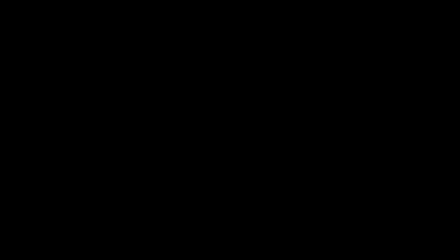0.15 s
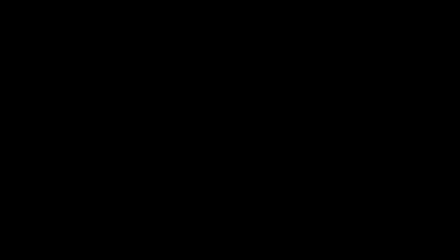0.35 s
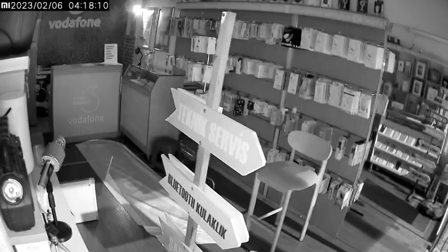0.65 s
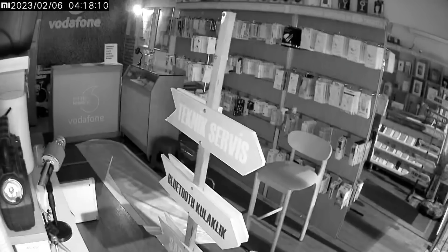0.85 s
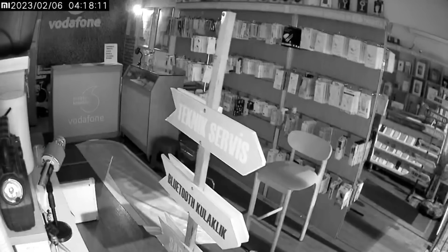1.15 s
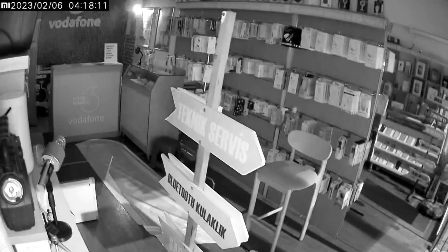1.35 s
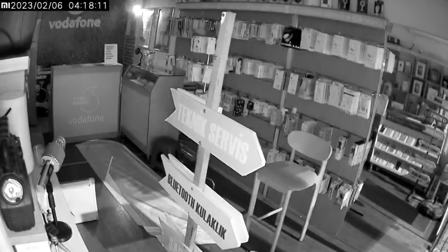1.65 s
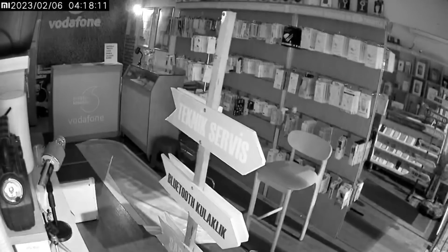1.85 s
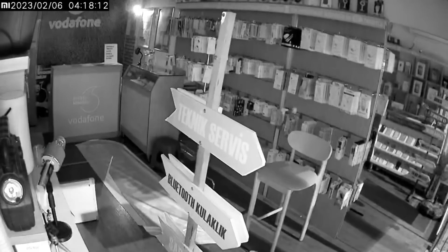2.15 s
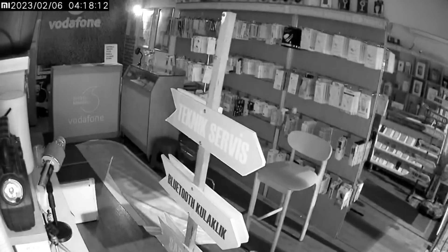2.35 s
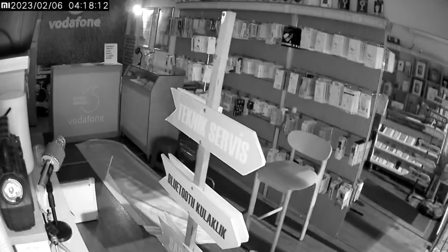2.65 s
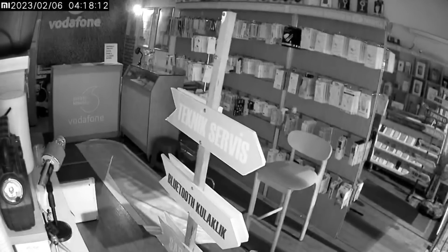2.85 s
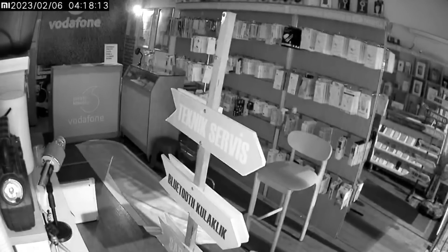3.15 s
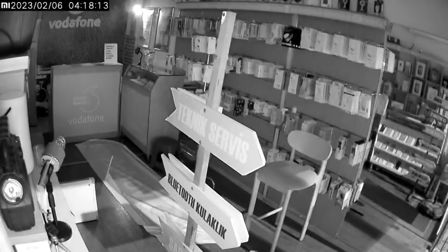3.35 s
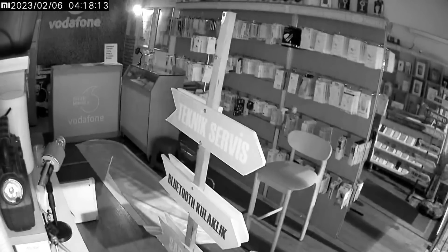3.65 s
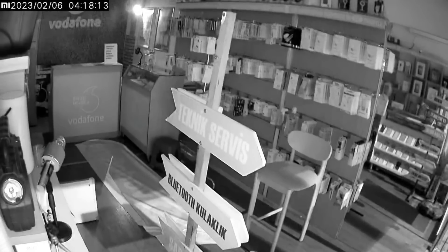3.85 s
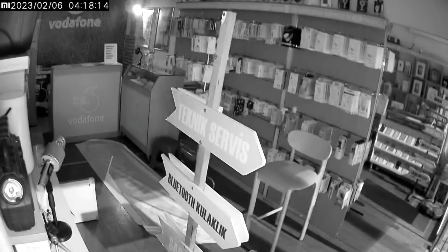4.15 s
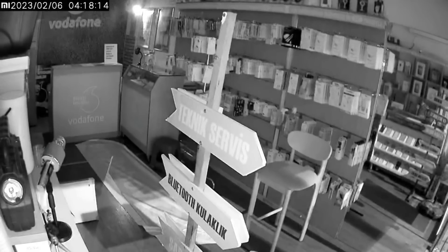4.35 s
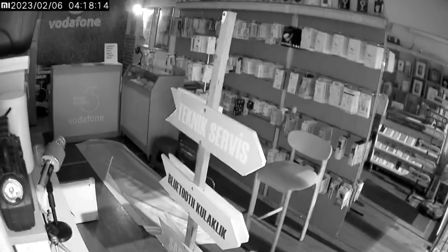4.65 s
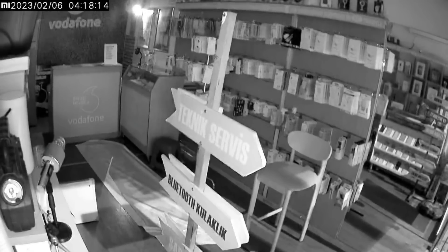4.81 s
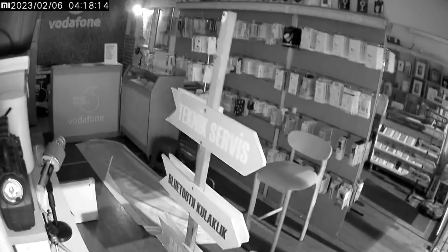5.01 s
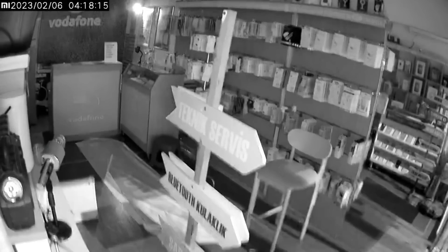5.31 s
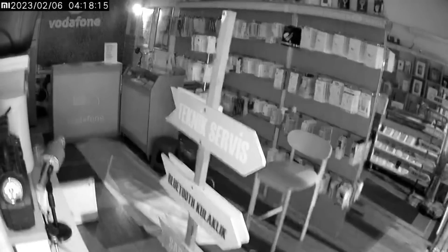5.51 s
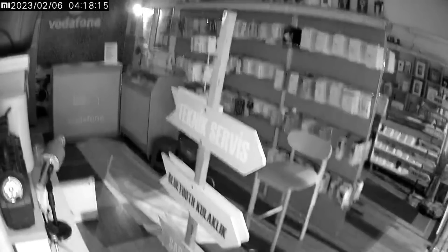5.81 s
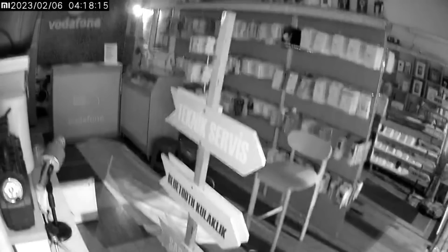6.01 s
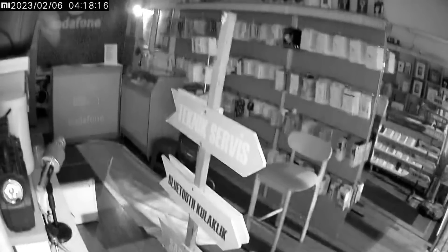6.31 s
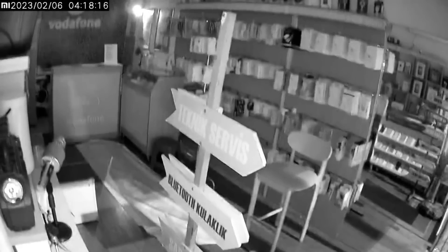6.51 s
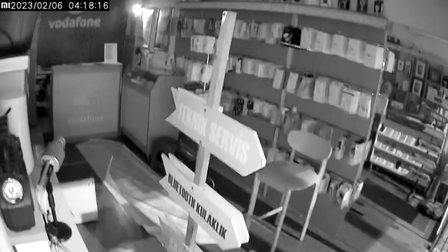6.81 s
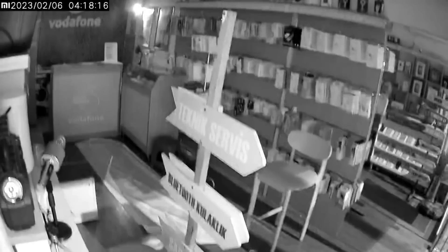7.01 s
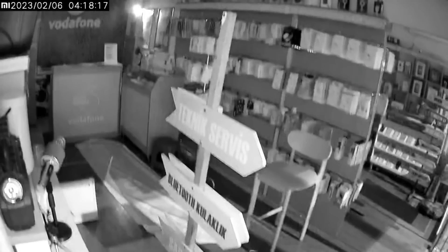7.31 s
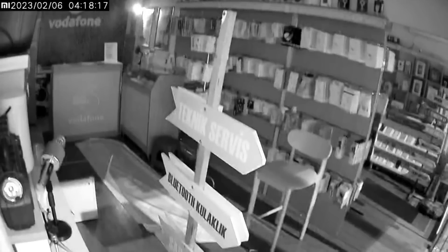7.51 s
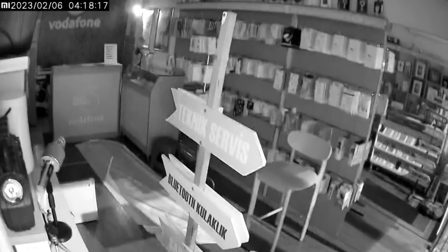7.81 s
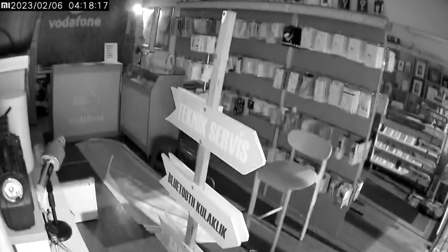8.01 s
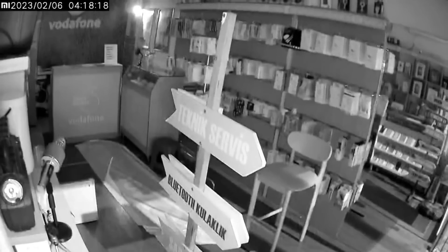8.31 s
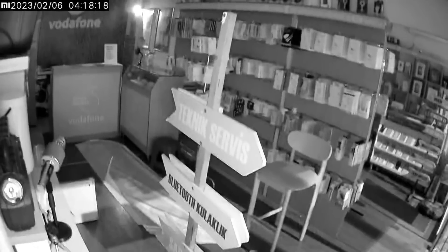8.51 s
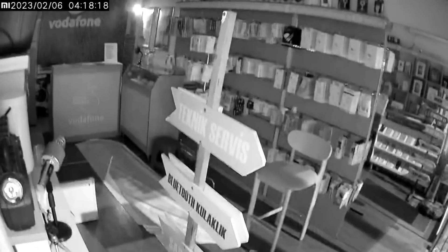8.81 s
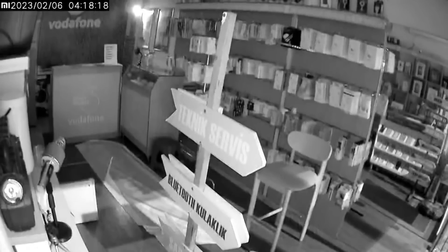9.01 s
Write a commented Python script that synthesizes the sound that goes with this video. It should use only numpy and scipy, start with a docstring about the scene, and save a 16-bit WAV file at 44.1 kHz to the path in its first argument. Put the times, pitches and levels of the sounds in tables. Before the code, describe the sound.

After a brief roar and silence, a building rumbles while a panel knocks, cabinets thud and goods tumble from rattling shop shelves.

```python
"""Earthquake in a small shop

A brief roar breaks off, and after a silence the scene changes. The building rumbles, shelves rattle, cabinets
thud and a loose panel knocks again and again against its stop. Goods tip, slide and crash to the floor; thin,
high tones linger after the blows. The shop is heard through a narrow-band security camera microphone that drops
out briefly four times."""
import sys
import numpy as np
from scipy import signal
from scipy.fft import rfft, irfft, next_fast_len
from scipy.io import wavfile

SR = 44100
rng = np.random.default_rng(int(sys.argv[2]) if len(sys.argv) > 2 else 0)


def output_pcm(signal):
    """Save a mono or channel-first signal as 16-bit PCM at the path in sys.argv[1].

    Samples are clipped to [-1, 1] before scaling.
    """
    pcm = np.clip(np.atleast_2d(signal).T, -1, 1) * 32767
    wavfile.write(sys.argv[1], SR, np.round(pcm).astype(np.int16))


N = 403956
TIME_S = np.arange(N) / SR
BLOW_S = np.arange(SR // 2) / SR   # time within one blow
MIC_TOP_HZ = 5050


def from_db(db):
    """Decibels to gain."""
    return np.exp(np.asarray(db) * (np.log(10) / 20))


def unit_rms(x):
    """Scale to unit power."""
    return x / np.sqrt(np.mean(x ** 2) + 1e-20)


def curves(rows):
    """Interpolate each column after t/s to every sample."""
    times_s, *columns = np.transpose(rows)
    return [np.interp(TIME_S, times_s, column) for column in columns]


def coloured(x, spectrum, tilt_db_oct=0):
    """Filter by a tilted spectrum, with 24 dB/octave skirts; unit power."""
    size = next_fast_len(len(x))
    octave = np.log2(np.maximum(np.fft.rfftfreq(size, 1 / SR), 1))
    hz, db = np.transpose(spectrum)
    outside_oct = np.maximum(octave - np.log2(hz[-1]), 0) + np.maximum(np.log2(hz[0]) - octave, 0)
    gain_db = np.interp(octave, np.log2(hz), db) + tilt_db_oct * octave - 24 * outside_oct
    return unit_rms(irfft(rfft(x, size) * from_db(gain_db), size)[:len(x)])


def tilt_treble(x, tilt_db_oct, corner_hz):
    """Tilt each row of x above a corner."""
    size = x.shape[-1]
    octaves = np.log2(1 + (np.fft.rfftfreq(size, 1 / SR) / corner_hz) ** 4) / 4
    return irfft(rfft(x) * from_db(tilt_db_oct * octaves), size)


def wash(spectrum, tilt_db_oct=0):
    """Coloured noise, one blow long."""
    return coloured(rng.standard_normal(len(BLOW_S)), spectrum, tilt_db_oct)


def tone(hz):
    """Sine, one blow long."""
    return np.sin(2 * np.pi * hz * BLOW_S)


def clang(partials=24, low_hz=1200):
    """Scattered partials of hard objects; unit power."""
    hz = rng.uniform(low_hz, MIC_TOP_HZ, (partials, 1))
    phase = 2 * np.pi * (hz * BLOW_S + rng.random((partials, 1)))
    return unit_rms(rng.standard_normal(partials) @ np.sin(phase.astype(np.float32)))


def contacts(per_s, size, spread_db):
    """Small impacts at random times."""
    out = np.zeros(size)
    at = np.flatnonzero(rng.random(size) < per_s / SR)
    signs = rng.choice([-1, 1], len(at))
    out[at] = signs * from_db(spread_db * np.minimum(rng.exponential(1, len(at)), 4))
    return out


def decay(t60_s, rise_s, hold_s=0):
    """Envelope: linear rise, hold, exponential fall."""
    falling_s = np.maximum(BLOW_S - rise_s - hold_s, 0)
    return np.minimum(BLOW_S / rise_s, 1) * from_db(-60 * falling_s / t60_s)


def burst(x, envelope):
    """Apply an envelope and scale to the envelope's energy."""
    return x * envelope * np.sqrt(np.sum(envelope ** 2) / np.sum((x * envelope) ** 2))


def drift(per_s):
    """Lines between unit Gaussian knots."""
    knots = rng.standard_normal(2000)
    return np.interp(TIME_S * per_s, np.arange(len(knots)), knots)


def add(out, t_s, sound):
    """Mix a sound in at t_s."""
    at = max(int(t_s * SR), 0)
    out[at:at + len(sound)] += sound[:N - at]


# roar envelope: t/s, level/dB
ROAR_LEVELS = [(0.0, -15.5), (0.064, -10.5), (0.14, -11)]
# roar spectrum: f/Hz, level/dB
ROAR_SPECTRUM = [(25, -27), (65, -8), (95, -20), (140, -6.5), (175, -2.5), (230, -3), (320, -3),
                 (410, -10.5), (560, -14), (700, -9), (1100, -14.5), (1750, -16), (2700, -25.5),
                 (5000, -33.5), (11500, -59)]


def roar(end_s=0.1487):
    """Loud, dense noise that breaks off dead; then the scene changes."""
    level_db, = curves(ROAR_LEVELS)
    return from_db(level_db) * coloured(rng.standard_normal(N), ROAR_SPECTRUM) * (TIME_S < end_s)


# shaking strength: t/s, rumble level/dB, rattle level/dB
SHAKING_LEVELS = [(1.06, -53, -59), (2.3, -55.5, -61), (2.75, -56.5, -61.5), (3.1, -67.5, -63.5),
                  (3.5, -54.5, -57.5), (4.2, -44.5, -37.5), (4.4, -51, -57.5), (4.9, -41, -35),
                  (5.3, -42.5, -39), (5.9, -46, -45), (6.2, -45.5, -40), (6.42, -47.5, -57),
                  (7.2, -47, -43), (7.55, -48, -51), (7.86, -51, -28.5), (8.15, -45, -50),
                  (8.5, -48.5, -47.5), (8.9, -48, -49), (9.16, -50, -53.5)]
# building spectrum: f/Hz, level/dB
RUMBLE_SPECTRUM = [(15, -37.5), (25, -17.5), (64, -9.5), (151, 3.5), (316, 0.5), (448, -15.5), (482, -3),
                   (607, -22.5), (672, -5.5), (800, -34.5), (1040, -42.5), (1760, -120)]


def building_rumble(sway, sway_db=3.2, flutter_db=1.1):
    """The building rumbles, surging as it sways."""
    level_db, _ = curves(SHAKING_LEVELS)
    gain = from_db(level_db + sway_db * sway + flutter_db * drift(per_s=29))
    return gain * coloured(rng.standard_normal(N), RUMBLE_SPECTRUM)


# shelf spectrum: f/Hz, level/dB
RATTLE_SPECTRUM = [(240, -34.5), (400, 3), (829, -5.5), (1020, 7), (1180, 1), (1320, 1), (1500, 4),
                   (3080, -7), (4790, -10.5), (5000, -36), (6500, -62.5), (11000, -120)]


def shelf_rattle(sway, sway_db=1.5, packets=4):
    """Packets tick on their hooks, each with its own ring."""
    _, level_db = curves(SHAKING_LEVELS)
    ticks = np.zeros(N)
    for _ in range(packets):
        ring = rng.standard_normal(len(BLOW_S)) * decay(t60_s=0.19, rise_s=0.0012)
        ticks += signal.oaconvolve(contacts(per_s=45, size=N, spread_db=4.5), ring)[:N]
    return from_db(level_db + sway_db * sway) * coloured(ticks, RATTLE_SPECTRUM)


# cabinets against the walls: t/s, level/dB, judder hold/s, creak re thud/dB, hum f/Hz
CABINET_HITS = [(1.06, -39.5, 0.054, -18, 167.5), (1.343, -38.5, .04, -4, 233),
                (1.547, -30.5, 0.042, -2, 235), (1.78, -25, 0.029, -8, 167.4),
                (2.133, -32.5, 0.022, -13, 155), (2.26, -35, 0.025, -10, 165.3),
                (3.249, -35, 0.15, -16, 140.8), (3.635, -32, 0.028, -19.5, 137),
                (4.17, -38.5, 0.092, -14, 165.5), (4.261, -36, 0.024, -13, 137),
                (4.471, -24, 0.013, -12, 134.5), (4.561, -35.5, 0.092, -17, 138),
                (4.76, -35.5, 0.058, -14, 113), (4.931, -25, 0.032, -1, 223.4),
                (6.135, -34, 0.046, -6, 224), (6.332, -35.5, 0.037, -10.5, 116.3),
                (6.525, -30, 0.1, -8, 219.7), (6.982, -22.5, 0.015, -20, 210.4),
                (7.303, -36, 0.011, -3, 116.4), (8.199, -41.5, 0.052, 2.5, 116.6),
                (8.884, -33.5, 0.024, -4.5, 165.7), (9.1, -39.5, 0.017, -4, 225)]
# thud spectrum: f/Hz, level/dB
THUD_SPECTRUM = [(40, -33), (90, -9), (135, 3), (200, -2), (300, -7), (450, -11.5), (700, -23.5),
                 (1500, -29)]
# joint spectrum: f/Hz, level/dB
CREAK_SPECTRUM = [(200, -13.5), (450, 10.5), (1300, 8.5), (2200, -2), (3200, -18), (5000, -31)]


def cabinet_thuds(thud_t60_s=0.32, hum_t60_s=0.27, creak_t60_s=0.19, rise_s=0.0055, judder_db=2.0):
    """Heavy, soft contacts boom in the room; each cabinet hums while its joints creak."""
    out = np.zeros(N)
    for t_s, level_db, hold_s, creak_db, hum_hz in CABINET_HITS:
        thud = burst(wash(THUD_SPECTRUM), decay(thud_t60_s, rise_s, hold_s))
        hum = tone(hum_hz) * decay(hum_t60_s, rise_s, hold_s)
        creak = from_db(creak_db) * wash(CREAK_SPECTRUM) * decay(creak_t60_s, rise_s, hold_s)
        add(out, t_s, from_db(level_db) * (thud + hum + creak))
    return out * from_db(judder_db * drift(per_s=60))


# thin, high ringing tones: f/Hz, level/dB
HIGH_TONES = [(2132, -11), (2406, -8), (2519, 3), (2826, 4), (2896, -7), (3009, -5.5), (3112, 1), (3214, 5),
              (3375, -5.5), (3741, -3.5), (3822, 1.5), (4300, -6), (4382, 4.5), (4592, 9), (4828, 9),
              (4969, -14.5)]


def thin_high_ring(drive, t60_s=0.28, wander_db=3.5):
    """Thin, high tones linger after the blows; now one stands out, now another."""
    out = np.zeros(N)
    radius = from_db(-60 / (t60_s * SR))
    for hz, db in HIGH_TONES:
        feedback = [1, -2 * radius * np.cos(2 * np.pi * hz / SR), radius * radius]
        ring = signal.lfilter([1 - radius, 0, radius - 1], feedback, drive + 1e-18)
        out += from_db(db + wander_db * drift(per_s=4.8)) * ring
    return out


# goods tipping: t/s, level/dB
CLACK_HITS = [(1.064,-40), (5.044,-28.5), (5.182,-25), (5.468,-27), (5.576,-23.5), (6.203,-20.5),
              (6.495,-25.5), (6.780,-25)]
# hard contact spectrum, clacks and knocks: f/Hz, level/dB
CONTACT_SPECTRUM = [(60, -22), (200, -6.5), (340, -12.5), (500, -10.5), (680, -4.5), (810, -8.5),
                    (1020, -2), (1400, 3), (1750, -5), (2150, 0), (2800, -7.5), (4000, -10.5), (5000, -27)]


def tipping_clacks(tilt_db_oct=-0.5, ring_db=-8.0):
    """Small, hard goods tip over: a bright contact and a thin ring."""
    out = np.zeros(N)
    for t_s, level_db in CLACK_HITS:
        hit = burst(wash(CONTACT_SPECTRUM, tilt_db_oct), decay(t60_s=0.2, rise_s=0.00079))
        ring = coloured(clang(), CONTACT_SPECTRUM, tilt_db_oct) * decay(t60_s=0.43, rise_s=0.0015)
        add(out, t_s, from_db(level_db) * (hit + from_db(ring_db) * ring))
    return out


# panel strikes: t/s, level/dB
PANEL_HITS = [(1.154,-13), (1.395,-33), (1.904,-18), (2.067,-15), (2.242,-11), (2.393,-26), (2.573,-19.5),
              (2.724,-31.5), (2.906,-27.5), (3.164,-27.5), (3.36,-15.5), (3.472,-19.5), (3.62,-12.5),
              (3.789,-9.5), (3.936,-12.5), (4.082,-14), (4.708,-5.5), (4.88,-10.5), (5.352,-8.5),
              (5.673,-22), (5.836,-20), (5.869,-21), (6.036,-14.5), (6.609,-13.5), (7.142,-24.5),
              (7.468,-8), (8.326,-8.5), (8.473,-24), (8.753,-15.5), (8.872,-24.5), (8.998,-13)]
# panel resonances: f/Hz, level/dB
PANEL_RESONANCES = [(481, -4.5), (540, -18), (672, -21), (893, -39), (974, 0.5), (1044, 11.5), (1092, -2.5),
                    (1205, -19.5), (1273, 10.5), (1343, 7.5), (1388, 16), (1448, -9.5), (1485, -7.5),
                    (1547, -8), (1601, -34.5), (1757, -4), (1851, 7.5), (1905, 0.5), (1999, -11),
                    (2099, -7), (2135, 4.5), (2174, -14.5), (2320, -30), (2410, -32.5), (2546, -8),
                    (2858, -29), (2993, -1)]


def panel_knocks(contact_s=0.0014, firm_db=-8.5, dulling_db=4, busy_db=-48.5, graze_db=-18.5):
    """A loose panel grazes, then hits its stop, with nearly the same ring and reflections each time."""
    out = np.zeros(N)
    mode_hz, mode_db = np.transpose(PANEL_RESONANCES)
    modes = np.sin(2 * np.pi * (mode_hz[:, None] * BLOW_S + rng.random((len(mode_hz), 1))))
    reflections = rng.standard_normal(len(BLOW_S))
    fittings = np.array([coloured(clang(partials=12), CONTACT_SPECTRUM, -3.0) for _ in range(8)])
    ring_env = from_db(-4.0) * decay(t60_s=0.17, rise_s=contact_s)
    direct_env = from_db(-4.5) * decay(t60_s=0.088, rise_s=contact_s)
    room_env = from_db(-10.0) * decay(t60_s=0.31, rise_s=0.01)
    jangle_env = from_db(-15.5) * decay(t60_s=0.44, rise_s=contact_s)
    graze_env = from_db(graze_db) * decay(t60_s=0.071, rise_s=0.0085)
    _, rattle_db = curves(SHAKING_LEVELS)
    for t_s, level_db in PANEL_HITS:
        ring = unit_rms(from_db(mode_db + 1.2 * rng.standard_normal(len(mode_hz))) @ modes)
        noise = coloured(reflections + 0.5 * rng.standard_normal(len(BLOW_S)), CONTACT_SPECTRUM)
        jangle = unit_rms(rng.standard_normal(len(fittings)) @ fittings)
        tilt_db_oct = -2 ** ((firm_db - level_db) / dulling_db)   # softer: duller
        tilt_db_oct += 0.11 * (rattle_db[int(t_s * SR)] - busy_db)   # busier shelves: brighter
        ring, noise, jangle = tilt_treble(np.array([ring, noise, jangle]), tilt_db_oct, corner_hz=1540)
        knock = ring * ring_env + burst(noise, np.hypot(direct_env, room_env)) + jangle * jangle_env
        add(out, t_s - 0.008, from_db(level_db) * noise * graze_env)
        add(out, t_s - contact_s / 2, from_db(level_db) * knock)
    return out


# slips along the shelves: t/s, level/dB, rise/s, t60/s, centre f/Hz
PACKET_SLIPS = [(2.954, -55.5, 0.025, 0.43, 3760), (4.443, -38, 0.041, 0.14, 2720),
                (6.071, -24, 0.014, 0.38, 1420), (6.141, -24.5, 0.016, 0.53, 1610),
                (6.469, -24, 0.04, 0.05, 1500), (6.521, -17, 0.0033, 0.52, 1640),
                (7.245, -36.5, 0.0073, 0.15, 2040), (7.279, -37, 0.012, 0.16, 1210),
                (8.223, -32.5, 0.015, 0.31, 3850)]
# slip spectrum: f/centre, level/dB
SLIP_SPECTRUM = [(0.251, -30), (0.601, -4.5), (0.801, 3.5), (1.249, 1.5), (1.7, -6.5), (3.502, -45.5)]


def packet_slides():
    """Packets slip in a quick run of tiny catches, each packet at its own pitch."""
    out = np.zeros(N)
    for t_s, level_db, rise_s, t60_s, centre_hz in PACKET_SLIPS:
        spectrum = [(centre_hz * ratio, db) for ratio, db in SLIP_SPECTRUM]
        catches = coloured(contacts(per_s=1500, size=len(BLOW_S), spread_db=0.0), spectrum)
        add(out, t_s, from_db(level_db) * burst(catches, decay(t60_s, rise_s)))
    return out


# box landings: t/s, level/dB, lowest mode f/Hz
BOX_HITS = [(4.945, -18.5, 287.7), (5.045, -28, 284.5), (6.988, -29, 226), (6.992, -27, 465.4),
            (7.601, -26, 225.4), (7.842, -29, 472), (7.984, -28.5, 467)]
# box resonances: f/lowest, level/dB, t60/s
BOX_RESONANCES = [(1, 1, 0.42), (1.085, -7, .26), (1.67, -8.5, 0.14), (2.08, -8.5, .15)]


def box_landings(waver=0.2):
    """Hollow boxes land and ring in low modes, wavering as they rock."""
    out = np.zeros(N)
    for t_s, level_db, lowest_hz in BOX_HITS:
        for ratio, mode_db, t60_s in BOX_RESONANCES:
            ring = tone(ratio * lowest_hz) * decay(t60_s, rise_s=0.006)
            add(out, t_s, from_db(level_db + mode_db) * ring)
    return out * (1 + waver * drift(per_s=72))


# goods landing: t/s, level/dB, rise/s, t60/s, tilt/(dB/octave), boom re clatter/dB
CRASH_HITS = [(5.147, -25.5, 0.0027, 0.26, -1, -34), (6.135, -34.5, 0.039, 0.74, -2.5, -14),
              (6.517, -22.5, 0.0044, 0.25, -1, -5.5), (6.545, -23.5, 0.012, 0.28, -1, -19),
              (6.771, -25.5, 0.01, 0.38, -6, -23), (6.975, -17.5, 0.023, 0.29, -0.5, -27),
              (7.576, -17.5, 0.033, 0.24, 4, -21.5), (7.592, -7.5, 0.0015, 0.41, -1, -7.5),
              (7.620, -23.5, 0.014, 1, 0, -36), (7.839, -22.5, 0.003, 0.35, -4, -31.5),
              (7.978, -22, 0.0044, 0.33, -3, -33)]
# clatter spectrum: f/Hz, level/dB
CRASH_SPECTRUM = [(47, -50), (80, -20.5), (214, -9.5), (354, 1), (393, -0.5), (459, -0.5), (509, -0.5),
                  (772, -3), (1460, 0), (1860, -0.5), (2000, -6.5), (3600, -1.5), (5000, -10), (6500, -65),
                  (11000, -120)]
# floor spectrum: f/Hz, level/dB
BOOM_SPECTRUM = [(14, 11.5), (30, -5), (62, -2), (100, 2), (250, -38.5), (600, -32)]


def floor_crashes(ring_db=-11.0, ring_t60_s=0.42, boom_t60_s=0.18):
    """A falling heap: a shower of contacts smeared by the room; hard things clang, the floor booms."""
    out = np.zeros(N)
    for t_s, level_db, rise_s, t60_s, tilt_db_oct, boom_db in CRASH_HITS:
        impacts = contacts(per_s=900, size=len(BLOW_S), spread_db=2.0)
        shower = coloured(impacts, CRASH_SPECTRUM, tilt_db_oct)
        smear = wash(CRASH_SPECTRUM, tilt_db_oct)
        clatter = burst(shower + smear, decay(t60_s, rise_s))
        ring = from_db(ring_db) * coloured(clang(), CRASH_SPECTRUM, tilt_db_oct)
        boom = from_db(boom_db) * burst(wash(BOOM_SPECTRUM), decay(boom_t60_s, rise_s))
        add(out, t_s, from_db(level_db) * (clatter + ring * decay(ring_t60_s, rise_s) + boom))
    return out


# dropouts: start t/s, end t/s, level/dB
MIC_DROPOUTS = [(3.711, 3.761, -41), (3.838, 3.904, -55), (6.717, 6.77, -36.5), (6.847, 6.913, -44)]


def camera_mic(x, start_s=1.062, fade_s=0.019, overload=0.8):
    """The small microphone rounds peaks and cuts treble; its sound starts abruptly and drops out."""
    gain_db = np.full(N, -2.0)
    for from_s, to_s, depth_db in MIC_DROPOUTS:
        inside_s = np.minimum(TIME_S - from_s, to_s - TIME_S)
        gain_db += depth_db * np.clip(inside_s / fade_s + 0.5, 0, 1)
    rounded = overload * np.tanh(x / overload)
    gated = rounded * from_db(gain_db) * (TIME_S > start_s)
    lowpass = signal.ellip(10, 0.3, 80, MIC_TOP_HZ, fs=SR, output="sos")
    return signal.sosfilt(lowpass, gated + 1e-18)


def scene():
    """The roar, then the shaking shop; both channels alike."""
    sway = drift(per_s=11)
    rumble = building_rumble(sway)
    shelves = shelf_rattle(sway) + packet_slides()
    blows = from_db(-1.5) * panel_knocks() + from_db(-0.5) * tipping_clacks()
    blows += from_db(-2.5) * cabinet_thuds() + from_db(1.0) * floor_crashes() + box_landings()
    shop = rumble + shelves + blows + thin_high_ring(blows + shelves)
    return np.tile(roar() + camera_mic(shop), (2, 1))


def record(dry, cutoff_hz=12000):
    """Clip peaks, then low-pass."""
    lowpass = signal.cheby2(12, 70, cutoff_hz, fs=SR, output="sos")
    return signal.sosfilt(lowpass, np.clip(dry, -0.9, 0.9) + 1e-18)


dry = scene()
out = record(dry)
output_pcm(out)
```